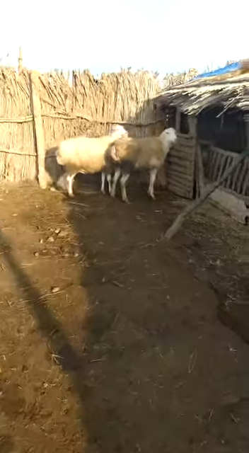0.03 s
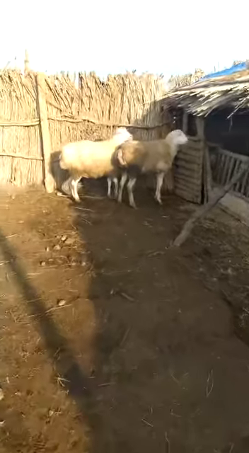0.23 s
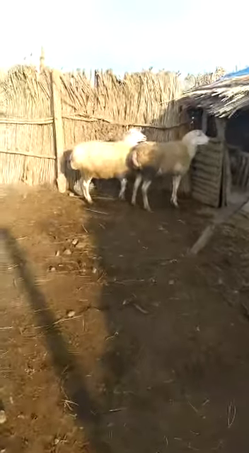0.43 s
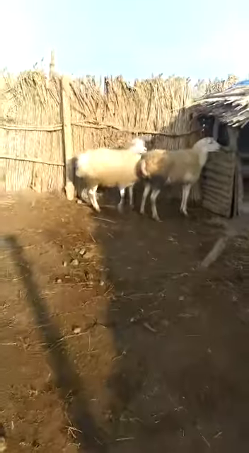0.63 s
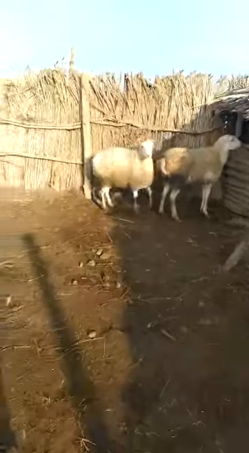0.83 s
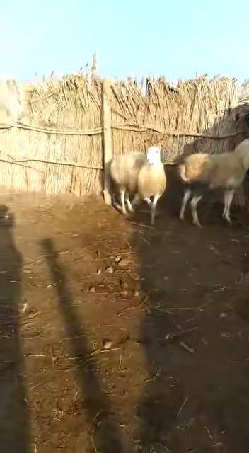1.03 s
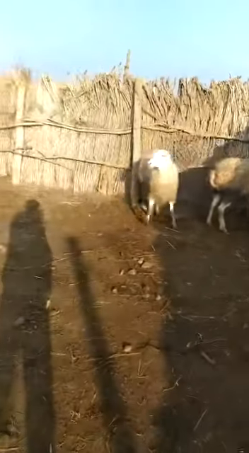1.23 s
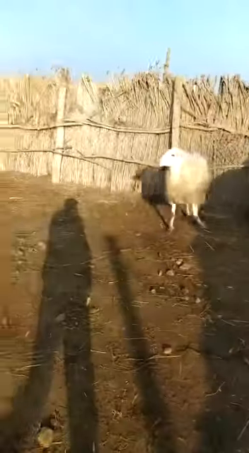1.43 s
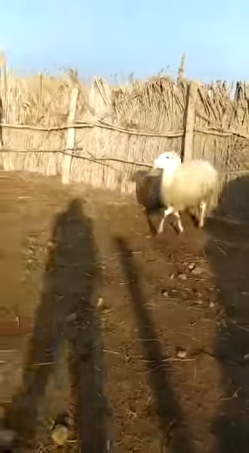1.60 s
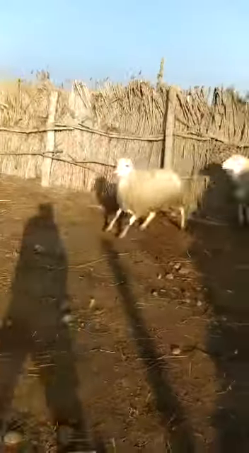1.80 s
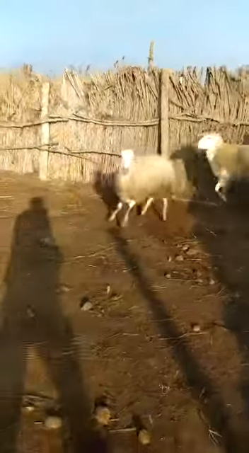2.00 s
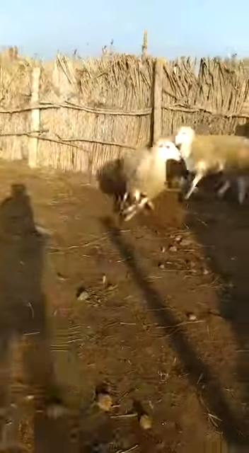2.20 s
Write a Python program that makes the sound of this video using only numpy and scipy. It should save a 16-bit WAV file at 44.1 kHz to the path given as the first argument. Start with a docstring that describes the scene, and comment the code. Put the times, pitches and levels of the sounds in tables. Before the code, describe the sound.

Loud, hoarse sheep bleat followed by a softer call, with faint hoof steps.

```python
"""Sheep bleating outdoors, in a dirt pen with a reed fence. A loud, close bleat starts hoarse, opens to a
clear tone, then rasps and breaks into shakes; a softer, higher call rises out of its end and sinks away.
Each call is vocal-fold pulses and breath ringing through a changing mouth, echoed by ground and fence.
Steps thud and scuff on the dirt, straw rustles, and a little wind brushes the microphone."""
import sys
import numpy as np
from scipy import signal
from scipy.fft import rfft, irfft, next_fast_len
from scipy.io import wavfile
from scipy.ndimage import uniform_filter1d, map_coordinates

SR = 44100
rng = np.random.default_rng(int(sys.argv[2]) if len(sys.argv) > 2 else 0)


def transcribe(signal):
    """Save signal, clipped to [-1, 1], as a 16-bit WAV file at the path in sys.argv[1]."""
    frames = np.atleast_2d(signal).T
    limited = np.clip(frames, -1, 1)
    pcm = np.round(limited * 32767).astype(np.int16)
    wavfile.write(sys.argv[1], SR, pcm)


N = 103635

# Vocal-fold melody: time_s, pitch_hz
LOUD_PITCH = [(0.23,249),(0.25,270.6),(0.316,286.4),(0.364,301.9),(0.422,314.7),(0.506,325.4),(0.816,334.5),(0.87,331.4),
              (0.942,333),(0.962,321),(0.98,316),(1.016,330.7),(1.052,327.6),(1.093,341.6),(1.112,304.6),(1.136,326.4),(1.155,328.6),(1.18,312.3),(1.225,320),(1.31,301.8)]
# Effort, and the breath hiss relative to the voice: time_s, level_db
LOUD_LEVEL = [(.13,-110),(0.164,-51),(.183,-39.5),(0.193,-29),(0.202,-29),(0.211,-34),(.228,-28),(.25,-23.5),(.35,-22),(.39,-19),(.46,-22.5),(.67,-21.5),(.88,-23.5),(.96,-22),(1.099,-23.5),(1.125,-30.5),(1.161,-25.5),(1.186,-37.5),(1.224,-27.5),(1.259,-37),(1.31,-37.5),(1.4,-110)]
LOUD_HISS = [(.17,-5),(.28,-12.5),(.55,-16),(.8,-11),(1.09,-7.5),(1.16,-19),(1.248,-1.5)]
# Hoarseness: time_s, period_scatter_percent, rasp_db
LOUD_ROUGH = [(.189,3.5,3.5),(.249,0.94,-13),(.33,0.31,-55),(.44,0.13,-32),(.522,0.099,-41),(0.861,0.057,-41),(.895,0.78,0.5),(.96,0.56,-29),(1.03,0.27,-23),(1.099,0.41,-2.5),(1.125,2.7,1),(1.149,0.21,-28),(1.22,0.9,-6)]
# Five throat and mouth colours: freq_hz, gain_db
GRUNT = [(120,-24),(230,-13),(450,-8),(800,3.5),(1200,-20),(2100,2.5),(2700,-30),(3300,-7),(5500,-36),(8500,-12),(13000,-29),(14200,-72)]
OPENING = [(150,-43),(290,-18),(440,-39),(590,-16.5),(880,-2.5),(1200,-9),(1500,-15),(1850,-7),(2200,3.5),(2520,-18),(2850,-6),(3200,-6.5),(3700,-14.5),(4300,-16),(5000,-22.5),(5500,-47),(6100,-18),(6800,-22),(8300,-10.5),(10300,-27.5),(12700,-25),(14000,-69)]
OPEN = [(150,-30),(330,-11.5),(480,-24),(660,-6.5),(1000,0.5),(1330,-9),(1650,-1.5),(1990,-2),(2330,-7.5),(2700,-7),(3000,-2.5),(3650,-8.5),(4300,-11.5),(4700,-15),(5650,-29),(6000,-17),(7000,-19),(7900,-5),(9000,-12.5),(10100,-16),(10900,-28),(12800,-16),(14000,-80)]
CLOSING = [(150,-49),(330,-16),(450,-26),(660,-12.5),(990,0),(1330,-11.5),(1650,-8),(2000,-8.5),(2300,-9),(2700,-7.5),(3000,-13),(3300,-7.5),(3800,-15.5),(4530,-16.5),(5730,-27.5),(7140,-24),(8000,-16),(9700,-21),(11000,-37),(13200,-24),(14300,-86)]
SQUEAL = [(150,-23),(290,-14),(430,-27),(640,-6.5),(960,-5),(1300,-4),(1650,-8),(2050,-18),(2600,4),(2900,-11),(3250,-1),(3600,-11.5),(4200,-9.5),(4700,-12.5),(6800,-26.5),(9500,-29),(14000,-59)]
# Morph through those colours: time_s, shape_index
LOUD_MOUTH = [(0.201,0),(0.236,1),(.42,1),(.53,2),(.92,2),(.98,3),(1.05,3),(1.14,4),(1.24,3.7)]
# Pan by arrival time: freq_hz, left_lead_ms
LOUD_LEAD = [(660,.37),(1000,.28),(2000,.15),(2700,.15),(3300,.22),(4500,.19)]
# Pan by level: freq_hz, left_over_right_db
LOUD_BALANCE = [(330,.5),(1000,3),(1650,4),(2250,3),(2800,-16),(3350,4.5),(3800,6.5),(4500,1),(5500,0),(8000,8),(9500,-1),(12500,7.5)]

def loud_bleat():
    """The close sheep on the left: a grunt opens to a clear tone and ends in a shaking squeal."""
    call = bleat(LOUD_PITCH, LOUD_LEVEL, LOUD_ROUGH, LOUD_HISS,
                 [GRUNT, OPENING, OPEN, CLOSING, SQUEAL], LOUD_MOUTH,
                 shimmer_db=2.0, memory=0.705, waver=0.01129, flutter_hz=64, flutter=0.29)
    return place(call, LOUD_LEAD, LOUD_BALANCE)


# Vocal-fold melody: time_s, pitch_hz
SOFT_PITCH = [(1.24, 348.4), (1.298, 371.1), (1.356, 381.8), (1.454, 388.3), (1.654, 392.9), (1.758, 388.8),
              (1.876, 367), (2.072, 350.2), (2.094, 341.6), (2.114, 300.2), (2.13, 290.5)]
# Effort, and the breath hiss relative to the voice: time_s, level_db
SOFT_LEVEL = [(1.17,-120),(1.248,-37),(1.36,-31),(1.52,-34),(1.65,-36),(1.751,-36),(1.821,-36),(1.845,-40.5),(1.96,-38.5),(2.071,-40.5),(2.13,-48.5),(2.22,-108)]
SOFT_HISS = [(1.27,-2),(1.42,-18.5),(1.75,-32),(2.1,-11.5)]
# Hoarseness: time_s, period_scatter_percent, rasp_db
SOFT_ROUGH = [(1.26,1.07,-1),(1.37,0.16,-16),(1.7,0.046,-56),(2.071,.12,-48),(2.11,2.3,-1)]
# Two throat and mouth colours: freq_hz, gain_db
SOFT_OPEN = [(200,-24.5),(390,-27.5),(780,-8.5),(1170,2),(1560,-17.5),(1960,-16.5),(2350,-16.5),(2720,-3.5),(3120,-23),(3520,-15.5),(3900,-8.5),(4300,-16),(4700,-13.5),(5100,-24.5),(5450,-18.5),(6700,-29.5),(8600,-21),(9700,-23.5),(11000,-77),(14000,-73)]
SOFT_CLOSING = [(200,-19),(360,-28),(720,-3),(1080,0),(1430,-8.5),(1800,-14),(2150,-18),(2500,0.5),(2850,-5.5),(3200,-13),(3900,-13.5),(4300,-12),(4650,-11.5),(5100,-23.5),(7000,-23),(9500,-13.5),(11000,-34),(14000,-60)]
# Morph between them: time_s, shape_index
SOFT_MOUTH = [(1.76,0.13),(1.9,0.69)]
# Pan by arrival time: freq_hz, left_lead_ms
SOFT_LEAD = [(1000,0.083),(8000,0.027)]
# Pan by level: freq_hz, left_over_right_db
SOFT_BALANCE = [(400,1.5),(1150,-3.5),(1900,2.5),(2700,-1.5),(3600,-3.5),(4400,5),(5800,-5),(8000,-1)]

def soft_bleat():
    """The higher call from straight ahead, sinking as the mouth closes."""
    call = bleat(SOFT_PITCH, SOFT_LEVEL, SOFT_ROUGH, SOFT_HISS, [SOFT_OPEN, SOFT_CLOSING], SOFT_MOUTH,
                 shimmer_db=1.5, memory=0.86, waver=0.00829, flutter_hz=117.5, flutter=0.038)
    return place(call, SOFT_LEAD, SOFT_BALANCE)


# Air hissing through the folds: freq_hz, gain_db
HISS_EQ = [(1000,-35),(1800,-10.5),(2200,1.5),(2600,-5.5),(3500,1.5),(4400,-3),(6900,-10),(7600,-0.5),(9000,-3.5),(12700,-27.5),(13800,-30)]
SMEAR_MS_PER_KHZ = .34  # the upper partials of each pulse trail the lower ones

def bleat(pitch, level, rough, hiss, shapes, mouth, shimmer_db, memory, waver, flutter_hz, flutter):
    """Fold pulses and rasp through a moving mouth; when hoarse, pitch wavers and loose tissue flutters."""
    scatter, rasp_db = curves(rough)
    hoarse = np.tanh(scatter)
    pitch_hz = curves(pitch)[0] * (1 + waver * hoarse * wobble(70))
    likeness = 1 - 0.59 * hoarse  # hoarse breath follows the pitch less
    pulses, puffs = folds(pitch_hz, scatter, shimmer_db, memory)
    flutter_cycles = np.cumsum(flutter_hz * (1 + 0.143 * wobble(24.6))) / SR
    pulses *= 1 + flutter * hoarse * np.sin(2 * np.pi * flutter_cycles)
    source = pulses + amp(rasp_db) * breath(puffs, pitch_hz, likeness)
    source = filtered(source, lambda hz: np.exp(-1j * np.pi * SMEAR_MS_PER_KHZ * (hz / 1000) ** 2))
    morph, = curves(mouth)
    vowels = [unit(ring(source, shape)) for shape in shapes]
    voice = even(sum(np.clip(1 - abs(morph - k), 0, 1) * vowel for k, vowel in enumerate(vowels)))
    air = unit(ring(breath(puffs, pitch_hz, likeness), HISS_EQ))
    return amp(curves(level)[0]) * (voice + amp(curves(hiss)[0]) * air)


def folds(pitch_hz, scatter, shimmer_db, memory):
    """One pulse per cycle, uneven in time and size when hoarse; also each cycle's puff envelope."""
    cycles = np.cumsum(pitch_hz) / SR
    onsets = np.interp(np.arange(1, int(cycles[-1])), cycles, np.arange(N))
    i = onsets.astype(int)
    chance = rng.standard_normal((len(onsets), 2))
    # memory is the share of each timing slip carried into the next cycle
    slip = signal.lfilter([1], [1, -memory], chance[:, 0] * scatter[i] / 100)
    onsets = np.clip(onsets + slip * SR / pitch_hz[i], 8, N - 10)
    sizes = amp(shimmer_db * np.tanh(scatter[i]) * chance[:, 1])
    taps = onsets.astype(int)[:, None] + np.arange(-7, 9)
    offset = taps - onsets[:, None]
    clicks = np.sinc(offset) * np.cos(np.pi * offset / 16) ** 2  # land between samples
    pulses = np.bincount(taps.ravel(), (clicks * sizes[:, None]).ravel(), N)
    return unit(pulses), np.cos(np.pi * cycles) ** 2


def breath(puffs, pitch_hz, likeness):
    """Puffs of air, each much like its neighbours, so the noise gathers round the harmonics."""
    air = puffs * rng.standard_normal(N)
    n, period = np.arange(N), SR / pitch_hz
    neighbours = map_coordinates(air, [n - period], order=5) + map_coordinates(air, [n + period], order=5)
    return unit(air + .5 * likeness * neighbours)


def place(x, lead, balance):
    """Pan a call: each frequency reaches the two microphone ports with its own delay and level."""
    half = np.array([[.5], [-.5]])

    def response(hz):
        lead_s = half * along(lead, hz) / 1000
        return amp(half * along(balance, hz)) * np.exp(2j * np.pi * hz * lead_s)
    return filtered(x, response)


def ground(x, gain_db=-16.5, delay_ms=2.2, sway_ms=0.032):
    """Add the ground bounce, its path swaying as sheep and microphone move."""
    echoes = []
    for channel in x:
        lag = (delay_ms + sway_ms * wobble(5.28)) * SR / 1000
        echoes.append(map_coordinates(channel, [np.arange(N) - lag]))
    return x + amp(gain_db) * np.array(echoes)


def fence(x, gain_db=-9, t60_s=.07, predelay_s=.007):
    """A short scattered echo off the reeds."""
    t = np.arange(SR // 3) / SR
    tail = rng.standard_normal((2, len(t))) * amp(-60 * t / t60_s) * (t > predelay_s)
    return amp(gain_db) * signal.fftconvolve(x, tail / np.linalg.norm(tail[0]), axes=1)[:, :N]


# Hoof falls: start_s, level_db, pitch_hz, t60_s, earth_db
STEPS = [(.725,-43,244,0.22,-54),(1.387,-51,254,0.076,-52),(1.706,-39.5,122.6,0.085,-40),(1.772,-36,187,0.049,-45),(2.192,-44,171,0.095,-69)]
# Soft earth under a hoof: freq_hz, gain_db
EARTH_EQ = [(110,3),(520,0),(800,-9),(8000,-57)]

def steps():
    """Each hoof lands as a dull, damped tone with a puff of soft earth."""
    t, thuds, earth = np.arange(N) / SR, np.zeros(N), np.zeros(N)
    for start_s, level_db, pitch_hz, t60_s, earth_db in STEPS:
        age = np.maximum(t - start_s, 0)
        envelope = (1 - np.exp(-age / 0.0013)) * amp(-60 * age / t60_s)
        thuds += amp(level_db) * envelope * np.sin(2 * np.pi * pitch_hz * age)
        earth += amp(earth_db) * envelope
    return thuds + earth * noise(EARTH_EQ, width=0.38)


# Dirt scuffs and straw rustles: peak_s, half_width_s, level_db
SCUFFS = [(.113,0.021,-46.5),(1.778,0.0035,-49),(2.323,0.025,-57)]
RUSTLES = [(.118,0.0018,-40.5),(2.14,0.015,-49)]
# Dull dirt and crisp straw: freq_hz, gain_db
DIRT_EQ = [(100,-20),(370,2),(600,-16.5),(1600,-2.5),(2600,-10.5),(14000,-28)]
STRAW_EQ = [(1000,-16),(6000,-15),(9000,10),(15500,-21)]

def scuffs():
    """Hooves brush dirt and dry straw in brief swells of noise."""
    return swells(SCUFFS) * noise(DIRT_EQ, width=0.51) + swells(RUSTLES) * noise(STRAW_EQ, width=1.0)


# Wind puffs and the air bed: time_s, level_db
WIND_LEVEL = [(0,-68.5),(1.38,-77),(1.47,-57),(1.6,-63),(1.78,-53.5),(1.9,-42),(1.97,-46.5),(2.05,-61.5)]
AIR_LEVEL = [(0,-62),(.2,-54.5),(1.5,-52.5),(2.35,-59)]
# Wind rumble and airy hush: freq_hz, gain_db
WIND_EQ = [(15,-11.5),(45,-6),(90,-19.5),(200,-21.5),(500,-48),(2000,-73)]
AIR_EQ = [(20,-5),(100,-12),(400,-8),(1500,-15),(5500,-22.5),(9600,-12.5),(12000,-28),(15500,-38)]

def outdoors():
    """Low puffs of wind on the microphone, heavier on the left, over quiet air."""
    wind = amp(curves(WIND_LEVEL)[0]) * noise(WIND_EQ, width=0.48) * amp([[3], [-4]])
    return wind + amp(curves(AIR_LEVEL)[0]) * noise(AIR_EQ, width=0.6)


def amp(db):
    """Decibels to gain."""
    return 10 ** (np.asarray(db) / 20)


def unit(x):
    """Scale to rms 1."""
    return x / np.sqrt(np.mean(x ** 2) + 1e-20)


def even(x, size=1301):
    """Hold the running rms at 1."""
    power = uniform_filter1d(uniform_filter1d(x * x, size), size)
    return x / np.sqrt(np.abs(power) + 1e-12)


def along(points, hz):
    """Read freq_hz, value points on a log frequency axis."""
    freqs, values = np.transpose(points)
    return np.interp(np.log(hz + 1), np.log(freqs + 1), values)


def curves(rows):
    """One automation curve for each column after the time."""
    times, *columns = np.transpose(rows)
    return [np.interp(np.arange(N) / SR, times, column) for column in columns]


def swells(rows):
    """An envelope of bell-shaped bumps."""
    t = np.arange(N) / SR
    return sum(amp(db) * np.exp(-((t - peak_s) / half_width_s) ** 2) for peak_s, half_width_s, db in rows)


def wobble(rate):
    """A smooth random curve, rate knots a second."""
    return map_coordinates(rng.standard_normal(int(N * rate / SR) + 4), [np.arange(N) * rate / SR])


def filtered(x, response):
    """Apply a complex frequency response."""
    size = next_fast_len(N + SR // 2)
    return irfft(rfft(x, size) * response(np.fft.rfftfreq(size, 1 / SR)), size)[..., :N]


def ring(x, shape, size=2048):
    """Resonate x through a minimum-phase filter with the given spectrum."""
    cepstrum = irfft(np.log(amp(along(shape, np.fft.rfftfreq(size, 1 / SR)))))
    cepstrum[1:size // 2] *= 2
    cepstrum[size // 2 + 1:] = 0
    return signal.fftconvolve(x, irfft(np.exp(rfft(cepstrum))))[:N]


def noise(shape, width):
    """Coloured stereo noise of rms 1; width is side over mid."""
    mid, side = filtered(rng.standard_normal((2, N)), lambda hz: amp(along(shape, hz)))
    return unit(np.array([mid + width * side, mid - width * side]))


def scene():
    """Two calls and their echoes, over hooves and open air."""
    calls = ground(loud_bleat() + soft_bleat())
    return calls + fence(calls) + steps() + scuffs() + outdoors()


TOP_HZ = 15700

def record(dry):
    """A brick-wall high cut on the mix."""
    return filtered(dry, lambda hz: hz < TOP_HZ)


dry = scene()
out = record(dry)
transcribe(out)
```